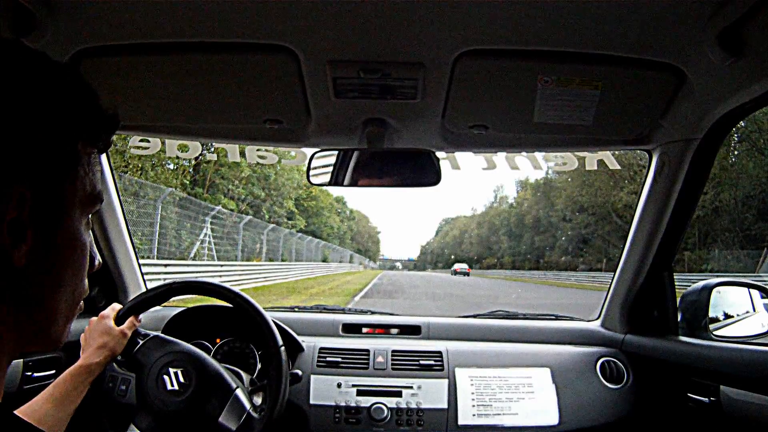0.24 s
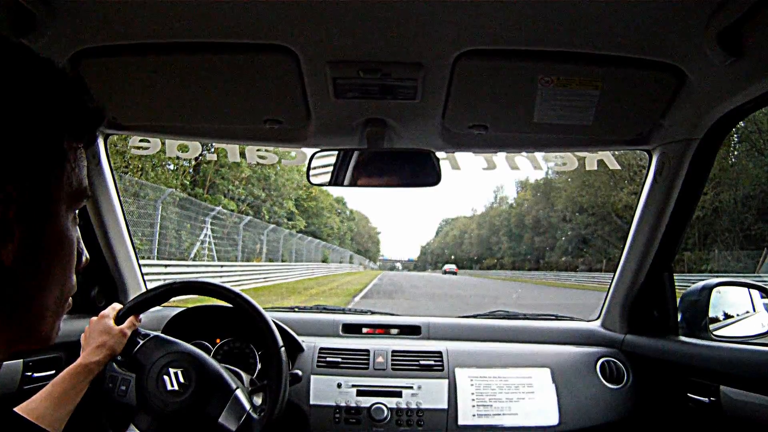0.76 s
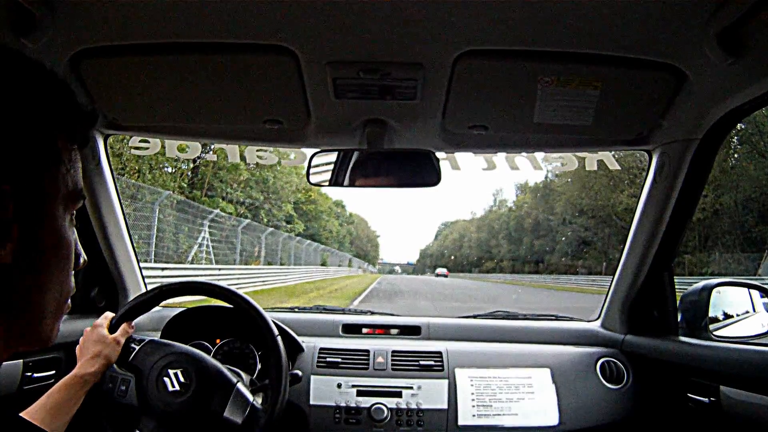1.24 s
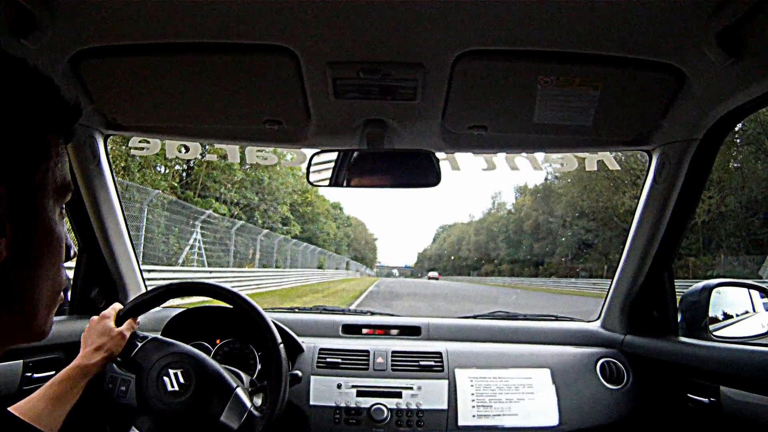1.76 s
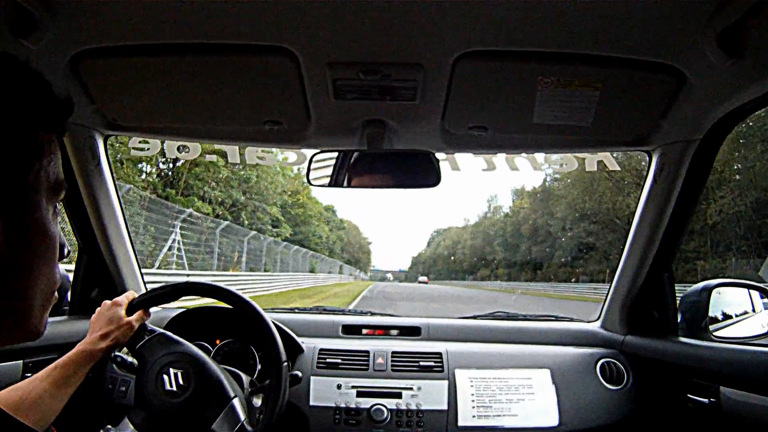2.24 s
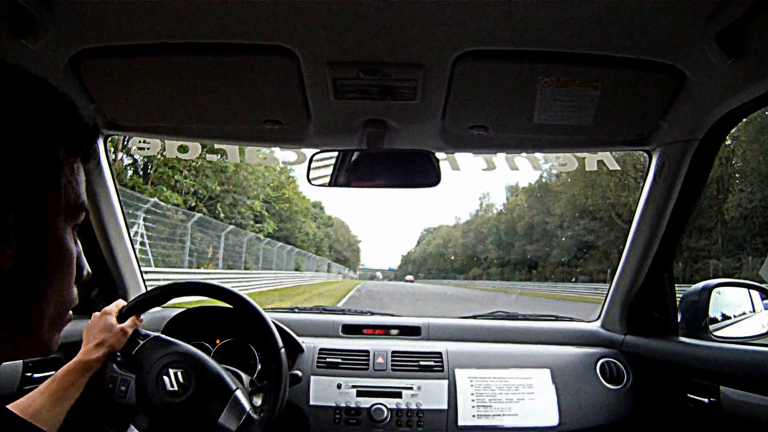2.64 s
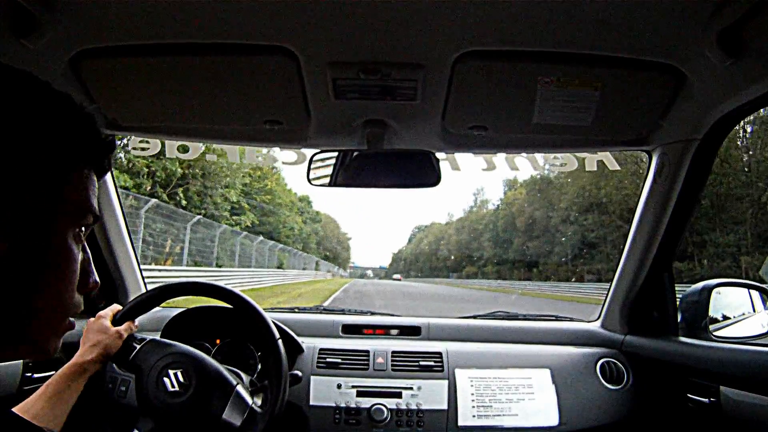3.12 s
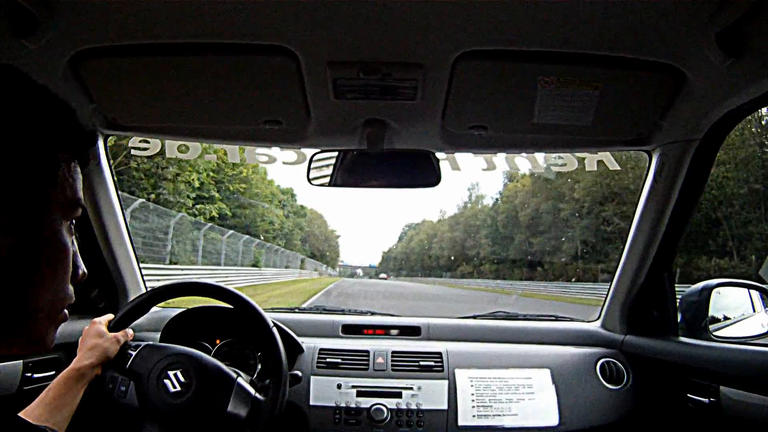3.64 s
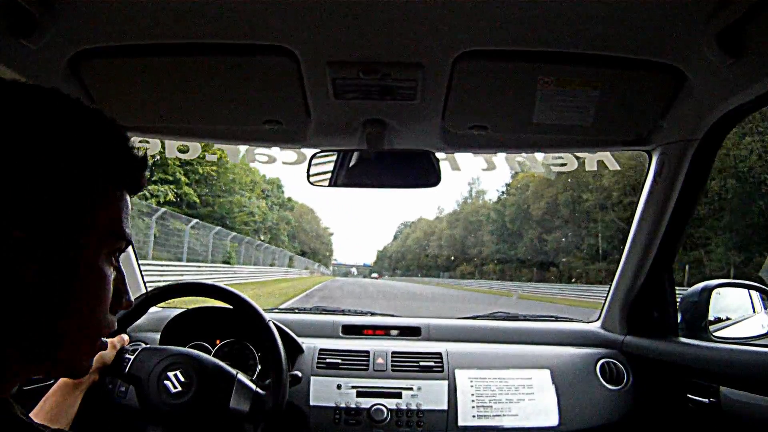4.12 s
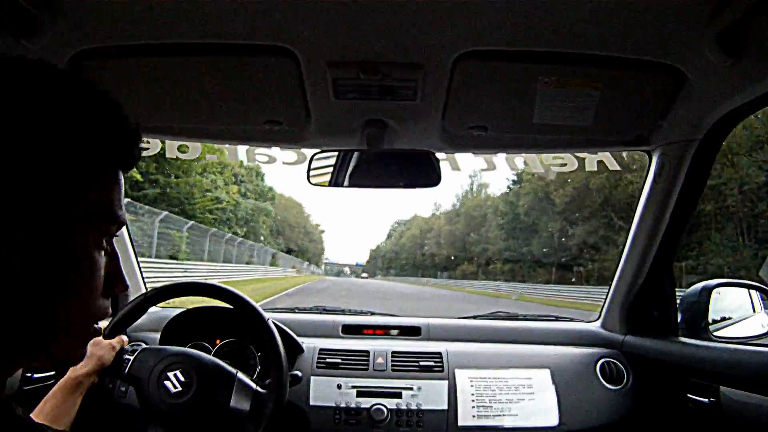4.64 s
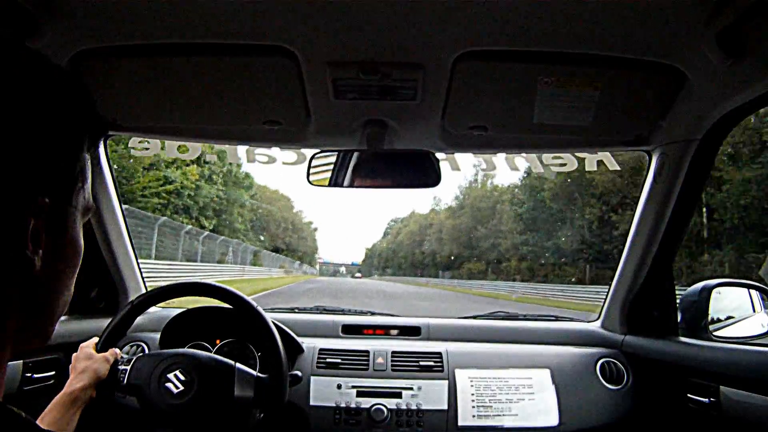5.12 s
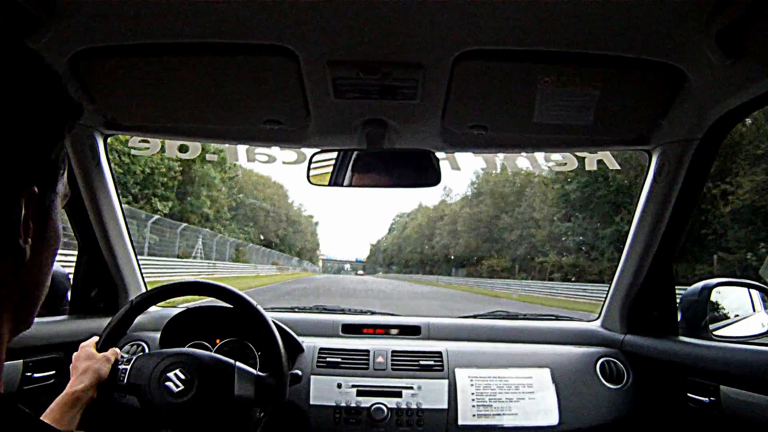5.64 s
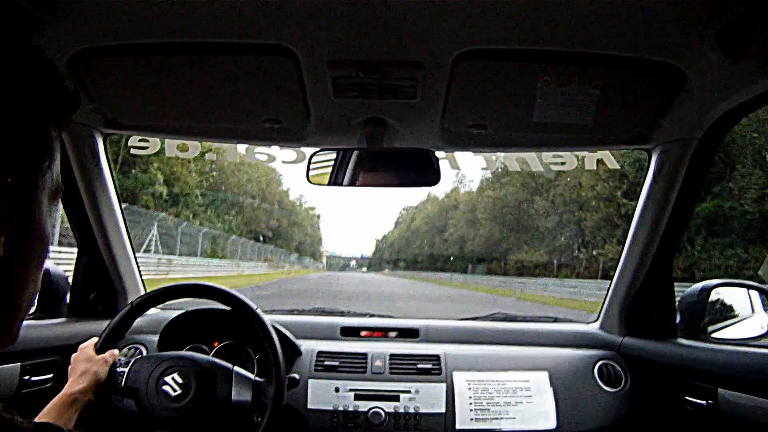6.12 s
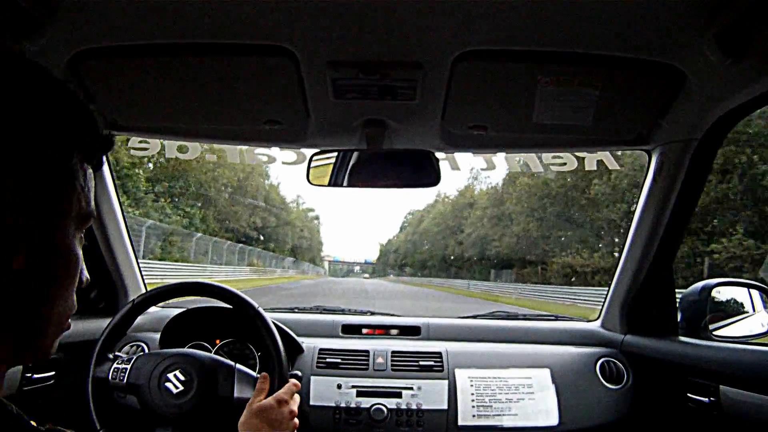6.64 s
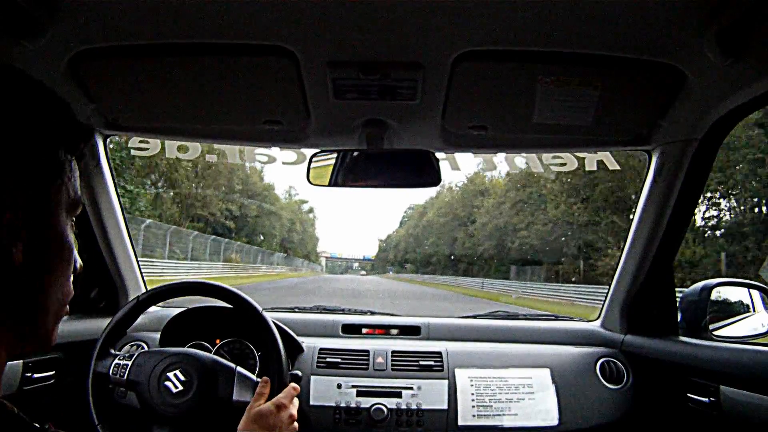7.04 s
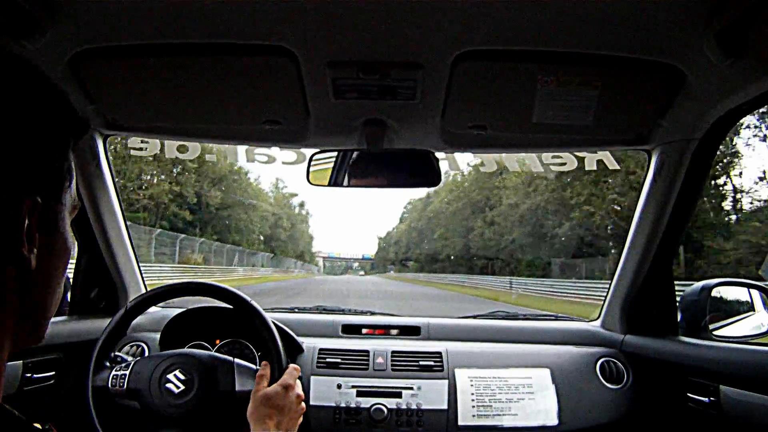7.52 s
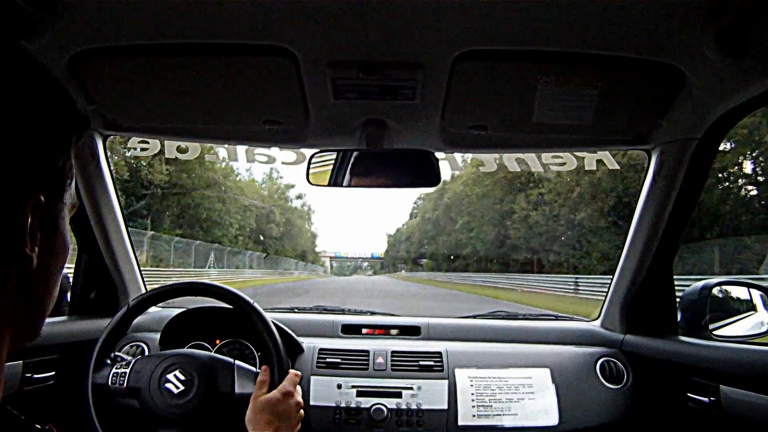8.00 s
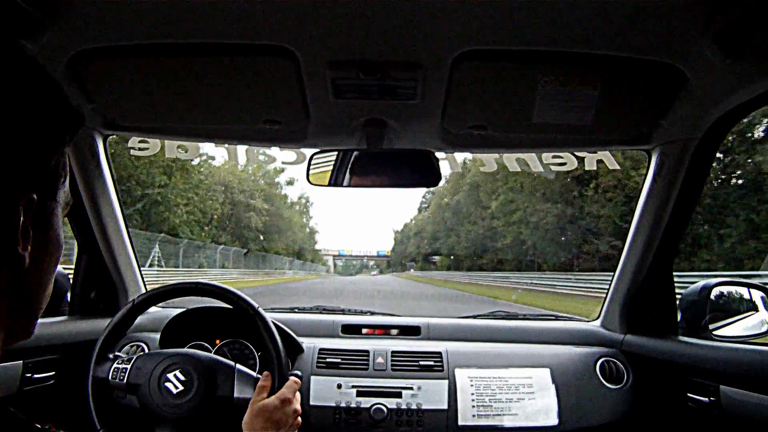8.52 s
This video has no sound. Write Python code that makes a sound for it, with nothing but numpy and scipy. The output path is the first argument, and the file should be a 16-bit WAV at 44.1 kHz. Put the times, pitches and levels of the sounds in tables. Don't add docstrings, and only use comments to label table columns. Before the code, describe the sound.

Inside a small car's boxy cabin, a four-cylinder engine idles low while an indicator relay ticks twice. It pulls away and rises, eases briefly for an upshift, then climbs in a long booming, rattling roar to the limiter. The throttle closes, the gear lever bangs metallically with a deep thump, and the engine pulls on at lower pitch. Road drone and hiss underneath; one gritty, coarse cabin microphone.

```python
import sys
import numpy as np
from scipy import signal
from scipy.fft import rfft, irfft, next_fast_len
from scipy.io import wavfile
from scipy.ndimage import uniform_filter1d

SR = 44100
rng = np.random.default_rng(int(sys.argv[2]) if len(sys.argv) > 2 else 0)


def field_ratio(decibels):
    return 10 ** (np.asarray(decibels, dtype=float) / 20)


def put_to_file(sound):
    columns = np.atleast_2d(sound).T
    safe = np.clip(columns, -1, 1)
    whole_steps = np.round(safe * 32767)
    wavfile.write(sys.argv[1], SR, whole_steps.astype(np.int16))


N = 386757

# t/s, firing rate f/Hz
FIRING_RATE = [(.9, 23.58), (1.12, 31), (1.59, 74.3), (1.95, 100.9), (2.2, 106.3), (2.49, 100.7),
               (2.78, 82.16), (3.1, 102.8), (3.72, 132.6), (4.32, 168.5), (5.13, 217.2), (5.69, 247.7),
               (6.33, 222.7), (6.52, 162.9), (6.63, 153), (6.75, 161.2), (8.23, 195.6), (8.77, 206)]
# t/s, opening [0-1]
THROTTLE = [(2.15, 0.66), (2.3, 0.64), (2.75, 0.8), (2.95, 0.99), (5.9, 0.83), (6.02, 0.18), (6.32, 0.15),
            (6.4, 0.26), (6.65, 0.67), (6.95, 0.73), (8.77, 0.73)]
# t/s, length/s, level/dB
ROAR_SWELLS = [(0.077, 0.058, 6), (0.656, .15, 6.5), (1.226, 0.16, -3.5), (2.086, 0.1, 1.5),
               (2.677, 0.35, 3.5), (3.5, 0.68, 1.5), (4.1, .12, -1.5), (4.336, 0.1, 3.5),
               (4.572, 0.16, -4.5), (4.94, 0.49, 1.5), (5.1, 0.12, -5), (5.3, 0.25, 0.5), (3.202, 0.2, 1),
               (7.8, 0.22, -0.5), (6.624, 0.1, -3), (1.65, 0.36, 0.5), (6.796, 0.18, 0.5), (5.665, 0.32, 3),
               (5.946, .1, 2.5), (6.045, 0.15, 0), (6.248, 0.27, 3.5), (6.52, .14, 5), (7.333, 0.15, 2),
               (7.615, 0.17, -2.5), (8.038, 0.16, 2), (8.588, 0.88, -1.5)]

# f/Hz, level/dB
BOOM = [(22, -36), (25, -20), (36, -13), (70, -11.5), (90, -17.5), (150, -16), (180, -12.5), (245, -13.5)]
# f/Hz, width/Hz, level/dB
BOOM_DIPS = [(57.5, 12, -14.5), (80.4, 6.1, -7), (131, 4.2, -8.5), (190, 3.5, -9), (204, 1.9, -9),
             (219.3, 2.9, -8.5), (238.4, 5.8, -3.5)]
# f/Hz, width/Hz, level/dB
DOUBLE_PANELS = [(74.5, 9.4, -15.5), (103.4, 28, -19), (130, 26, -24.5), (152, 23, -27), (180, 20, -30),
                 (207.4, 12, -26), (289.66, 35, -25.5), (317.85, 17, -31.5), (342, 7.9, -27.5),
                 (391, 44, -25.5), (416, 8.4, -21), (458, 33, -22.5), (484, 34, -24)]
# f/Hz, width/Hz, level/dB
TRIPLE_PANELS = [(114, 34, -22.5), (171, 40, -29.5), (215, 37, -29), (311, 65, -28), (351.4, 7.1, -25),
                 (389, 37, -27.5), (427, 14, -33), (470, 20, -44), (516, 26, -22.5), (610, 81, -25),
                 (667, 20, -21), (723, 27, -28.5)]
# f/Hz, width/Hz, level/dB
ODD_PANELS = [(105, 22, -44), (286, 31, -37), (394, 11, -26.5), (443, 37, -25), (510.5, 43, -23),
              (607, 86, -32.5), (690, 35, -27.5)]
# (f/Hz, width/Hz, level/dB)
CRANK_LINES = [
    (.5, 0.1, [(46, 11, -37), (66.4, 23, -32.5), (97, 12, -42), (123, 23, -33)]),
    (.75, 0.98, [(63, 33, -32), (95, 13, -38.5), (121.5, 12, -31.5), (145.6, 12, -29), (170.7, 10, -22.5), (178.3, 4, -18.5), (189.3, 9, -25)]),
    (5 / 4, .7, [(130, 16, -30), (168.4, 14, -30), (204, 13, -32), (233, 23, -30.5), (249, 14, -41), (274, 10, -30), (298, 14, -31)]),
    (3 / 2, 0.11, [(158, 52, -40.5), (184, 6.7, -37.5), (232, 10, -36), (289, 8.7, -32.5), (349.3, 15.4, -25), (367, 14, -24)]),
    (7 / 4, 0.77, [(171, 28, -32.5), (240, 29, -30.5), (325, 25, -31), (349, 26, -31), (366, 30, -28.5), (392.2, 15, -24), (434, 20, -30)]),
    (9 / 4, 1, [(202, 30, -46.5), (270, 27, -34), (393, 36, -32), (439, 32, -26), (445, 21, -35), (517, 37, -24), (560.3, 11, -17)]),
               (5 / 2, 1, [(267, 45, -37), (345, 94, -29.5), (401, 30, -30), (508, 69, -33.5),
                (590, 92, -35)]), (13 / 4, 0.54, [(330, 65, -42), (468, 92, -32), (512, 30, -33),
                (553, 30, -30.5), (657, 35, -34.5)]), (7 / 2, 0.35, [(357, 88, -32), (567, 57, -37.5),
                (604, 30, -40), (675.4, 15.5, -26.5), (724, 32, -28.5), (775, 55, -43.5), (860, 17, -35)]),
                (15 / 4, 0.9, [(385, 50, -37), (487, 130, -44), (671, 38, -32), (721, 35, -34.5)]),
                (4, 1, [(252, 67, -42), (325, 18, -32), (380, 36, -33.5), (514, 63, -29.5),
                (651, 59.6, -29), (698, 24, -35), (763, 31, -38), (880, 100, -41)]),
                (17 / 4, 0.61, [(442, 40, -34.5), (513, 60, -34.5), (606, 33, -35), (665, 34, -43),
                (765, 39, -42)]), (9 / 2, .1, [(420, 53, -43.5), (535, 90, -35.5), (616, 56, -36),
                (704, 50, -42), (770, 50, -43.5), (864, 40, -45.5), (980, 71, -43), (1072, 44, -38.5)]),
               (19 / 4, 0.44, [(270, 68, -43), (430, 39, -43), (514, 30, -49), (665, 40, -36.5),
              (746, 40, -42.5), (910, 110, -45.5)]), (5, 0.62, [(300, 80, -39), (525, 59, -34.5),
              (690, 68, -32.5), (920, 80, -48.5), (1037, 45, -38), (1170, 60, -47)]),
              (23 / 4, 0.55, [(546, 20, -43.5), (610, 50, -51), (700, 40, -53), (956, 60, -49),
              (1050, 69, -46), (1180, 65, -44.5)]), (11 / 2, 1, [(520, 26, -41), (667, 34, -33),
              (760, 43, -49), (910, 100, -44), (1040, 100, -47)]), (6, 1, [(538, 40, -37), (661, 67, -28.5),
              (733, 37, -31.5), (810, 44, -42), (1060, 40, -46), (1147, 41, -36)])]
# multiple of firing rate, low-rev level/dB, full-rev level/dB
CABIN_LINES = [(5.251, -3.5, -11), (6.25, -18, -7.5), (6.5, -12, -9.5), (6.75, -16, -10), (6.999, -9, -10),
               (7.25, -15.5, -12), (7.5, -12, -10), (8, -14.5, -5), (9, -18, 0)]
# f/Hz, width/Hz, level/dB
CABIN = [(190, 128, -3.5), (328.5, 56, 5.5), (343, 43, 2.5), (431, 21, -4), (523, 80, 2), (665, 21.5, 4.5),
         (747, 23, -3.5), (787, 22, -15), (1060, 45, -4.5), (1167, 30, -9.5)]

# t/s, peak level/dB, brightness/dB per octave
LEVER_HITS = [
    (6.3131, -6, 0),
    (6.3157, -15, 2),
    (6.3192, -17, 2),
    (6.3235, -28, 12),
    (6.3351, -15, 11),
    (6.3372, -17, 0),
    (6.3405, -22, -3),
    (6.3457, -16, -1),
]
# f/Hz, level/dB, time to fade 60 dB/s
LEVER_MODES = [(770, -8, .035), (1050, -9, .025), (1500, -12, .012), (2050, -3, .016), (2400, -1, .014),
               (2830, 0, .018), (3250, -7, .012), (3750, -15, .012), (4700, -13, .018), (5450, -17, .014)]
# t/s, peak level/dB, f/Hz, time to fade 60 dB/s
KNOCKS = [(0.06, -22, 153, 0.12), (0.09, -24.5, 170, 0.062), (0.532, -27.5, 151, 0.15),
          (0.569, -30, 139, 0.098), (0.628, -21, 48, 0.053), (0.679, -21, 52, 0.14),
          (0.63, -20.5, 131, 0.08), (7.2, -18, 217, 0.12), (6.308, -22, 214, .08), (5.935, -26, 150, .08),
          (6.8, -29, 95, .09), (6.1825, -34, 4590, 0.027), (2.925, -34.5, 2500, 0.044),
          (2.926, -43, 1680, .07), (3.2, -39, 3060, .04), (2.9265, -45, 2050, .04), (2.6, -38, 2950, 0.034),
          (2.924, -46, 4750, .03), (3.6, -43, 2500, .04), (6.327, -5, 44.7, 0.046), (.96, -41, 335, 0.23),
          (6.356, -5, 22, 0.61), (6.559, -11.5, 156, 0.095)]
# t/s, peak level/dB, brightness/dB per octave, time to fade 60 dB/s
CLICKS = [(1.143, -35, -3, 0.03), (1.171, -29.5, 0, 0.022), (1.199, -31.5, 5, 0.02), (2.925, -28.5, 8, 0.1),
          (2.9338, -35.5, 3, 0.029), (3.384, -30, 8.5, 0.03), (6.1833, -19, 6, .024),
          (6.3145, -18, 6, 0.012), (6.3363, -20, 9, 0.015), (6.4428, -24, 1, 0.039),
          (6.6248, -30.5, 16, 0.03)]
# t/s, peak level/dB
RELAY_TICKS = [
    (0.6493, -22),
    (0.9533, -22),
]
# f/Hz, level/dB, time to fade 60 dB/s
RELAY_MODES = [(2030, -19, .12), (2190, -8, .14), (2400, -15, .13), (2560, -11, .12), (2690, -12, .17),
               (2790, -1, .18), (2865, 0, .12), (2975, -16, .17), (3080, -2, .17), (3150, -3, .18),
               (3225, 0, .11), (3545, -17, .11), (3935, -22, .12), (4620, -24, .1)]
# start t/s, end t/s, f/Hz, level/dB
BUZZES = [(-.4, 1.8, 2820, -58.5), (-.4, 1.1, 5260, -72), (2.335, 2.7, 665, -35),
          (2.63, 2.81, 499.5, -24.5), (2.77, 2.92, 520.5, -26.5), (5.56, 5.84, 2203, -33),
          (5.6, 5.76, 2980, -38.5), (5.66, 5.78, 2010, -37), (5.77, 5.95, 2660, -32.5),
          (6.048, 6.16, 1590, -41.5), (6.15, 6.21, 680, -28.5), (6.2, 6.32, 663, -23.5),
          (6.48, 6.57, 665, -27)]

# t/s, level/dB
SHAKE_LEVEL = [(.9, -37), (1.3, -34.5), (1.7, -33.5), (2.15, -26.5), (2.4, -28.5), (2.75, -27.5), (3, -31),
               (4, -25.5), (4.6, -28), (5.1, -27.5), (5.6, -26), (5.9, -18), (6.2, -18.5), (6.6, -22.5),
               (7.2, -23), (7.7, -27), (8.05, -21), (8.3, -27), (8.65, -22.5)]
# t/s, f/Hz
ROCKING = [(1.3, 22), (2.2, 24), (2.7, 29), (3.5, 29), (4.2, 30), (4.6, 24.9), (5.5, 25), (5.9, 22.4),
           (7, 21), (7.3, 29.3), (7.9, 20), (8.3, 27), (8.77, 36.3)]
# f/Hz, level/dB per Hz
SHAKE_COLOUR = [(12, 5.5), (30, 14.5), (42, 13), (52, 10), (100, -31.5)]
# f/Hz, level/dB per Hz
DRONE_COLOUR = [(29, -43), (50, -10.5), (100, -9.5), (200, -4), (310, -16.5), (470, -11), (700, -14),
                (860, -26), (1200, -20.5), (1500, -24), (2000, -68), (3300, -120)]
# f/Hz, level/dB per Hz
HISS_COLOUR = [(470, -2.5), (800, -1.5), (900, -3), (1060, -6.5), (1180, -2), (1270, -7.5), (1490, -6.5),
               (1800, -11), (2040, -7.5), (2500, -9), (2960, -5.5), (3650, -19), (4900, -19.5),
               (6000, -39.5), (7800, -81), (13200, -120)]
# f/Hz, width/Hz, level/dB
HISS_RIDGES = [(1040, 22, 4), (2020, 35, 1.5), (2230, 42, 6), (2660, 18, -11), (2926, 65, -0.5),
               (3090, 54, 3), (5300, 43, -7)]

# t/s, depth/dB, recovery/s
GAIN_DUCKS = [
    (1.209, -4, 0.04),
    (6.355, -11.5, 0.27),
]

TIME = np.arange(N) / SR
SHORT_TIME = np.arange(SR // 4) / SR


def unit(x):
    return x / np.sqrt(np.mean(x ** 2) + 1e-20)


def along(points, hz):
    f, value = np.transpose(points)
    return np.interp(np.log(hz + 1), np.log(f + 1), value)


def over_time(rows):
    s, value = np.transpose(rows)
    return np.interp(TIME, s, value)


def wobble(rate):
    knots = rng.standard_normal(int(N * rate / SR) + 4)
    return np.interp(np.arange(N) * rate / SR, np.arange(len(knots)), knots)


def filtered(x, response):
    m = next_fast_len(len(x) + SR // 4)
    return irfft(rfft(x, m) * response(np.fft.rfftfreq(m, 1 / SR)), m)[:len(x)]


def peaks(table, hz):
    return np.sqrt(sum(field_ratio(2 * db) / (1 + ((hz - c) / (w / 2)) ** 2) ** 2 for c, w, db in table))


def swept(table, hz):
    grid = np.arange(2500.)
    return np.interp(hz, grid, peaks(table, grid))


def cabin_gain(hz):
    return np.sqrt(sum(field_ratio(2 * db) / (1 + ((hz - c) / (w / 2)) ** 2) for c, w, db in CABIN))


def rush(colour, patchy_db, ring=0):
    _, _, z = signal.stft(rng.standard_normal(N), SR, nperseg=1024)
    patches = uniform_filter1d(rng.standard_normal(z.shape), size=8, axis=0)
    patches = uniform_filter1d(patches, size=6, axis=1)
    white = signal.istft(z * field_ratio(patchy_db * unit(patches)), SR, nperseg=1024)[1][:N]
    return unit(filtered(white, lambda f: field_ratio(along(colour, f)) * cabin_gain(np.maximum(f, 150)) ** ring))


def add(track, s, sound):
    part = track[round(s * SR):][:len(sound)]
    part += sound[:len(part)]


def driving():
    flywheel_s = 0.052
    rate = uniform_filter1d(over_time(FIRING_RATE), round(flywheel_s * SR))
    shut = 1 - over_time(THROTTLE)
    surge_db = sum(db * np.exp(-(2 * (TIME - s) / length) ** 2) for s, length, db in ROAR_SWELLS)
    return rate, shut, surge_db


def firing_boom(rate, shut, turns):
    limiter_s, limiter_length_s, limiter_db = 5.7, 0.16, -12.5
    level_db = along(BOOM, rate) - 6 * shut
    level_db += sum(db / (1 + ((rate - c) / (w / 2)) ** 2) for c, w, db in BOOM_DIPS)
    level_db += limiter_db * np.exp(-(2 * (TIME - limiter_s) / limiter_length_s) ** 2)
    boom = field_ratio(level_db + 1.03 * wobble(19)) * np.cos(turns + 0.42 * wobble(24))
    return np.sqrt(2) * boom


def panel_tones(rate, shut, turns):
    effort_db = -17 * shut
    loose = np.clip(rate / 150, .1, 1)
    double = swept(DOUBLE_PANELS, 2 * rate) * field_ratio(effort_db + 3.8 * wobble(19))
    tone = double * np.cos(2 * turns + 0.64 * loose * wobble(11.0))
    triple = swept(TRIPLE_PANELS, 3 * rate) * field_ratio(effort_db + 1.15 * wobble(13))
    tone += triple * np.cos(3 * turns + 0.99 * loose * wobble(8.4))
    odd = swept(ODD_PANELS, 11 / 4 * rate) * field_ratio(.8 * effort_db + 1.5 * wobble(12))
    tone += odd * np.cos(11 / 4 * turns + .45 * wobble(14))
    for multiple, share, panels in CRANK_LINES:
        flicker = field_ratio(share * effort_db + 1.3 * wobble(9))
        phase = 2 * np.pi * rng.random() + (.22 + .03 * multiple) * wobble(13)
        tone += swept(panels, multiple * rate) * flicker * np.cos(multiple * turns + phase)
    for k in range(4, 9):
        tone += swept([(36, 9.6, -34 - 4 * (k - 4))], rate) * np.cos(k * turns)
    return np.sqrt(2) * tone


def cabin_tones(rate, turns, load_db):
    grid = np.linspace(0, 3000, num=1500)
    gain = cabin_gain(grid) ** 0.91
    revs = np.clip((rate - 90) / 140, 0, 1)
    tones = np.zeros(N)
    for multiple, low_db, full_db in CABIN_LINES:
        drift = 2 * np.pi * rng.random() + .08 * multiple * wobble(22)
        level = field_ratio(low_db + revs * (full_db - low_db) + 2.5 * wobble(8))
        tones += level * np.interp(multiple * rate, grid, gain) * np.sin(multiple * turns + drift)
    tones *= np.clip((rate - 25) / 60, .05, 1)
    return field_ratio(load_db - 9.0) * tones


def engine(rate, shut, surge_db, load_db, turns):
    grit = field_ratio(.6 * wobble(70) * np.clip(rate / 120, 0, 1))
    overtones = field_ratio(.5 * surge_db) * panel_tones(rate, shut, turns)
    return firing_boom(rate, shut, turns) + grit * (overtones + cabin_tones(rate, turns, load_db))


def gear_lever():
    out, t = np.zeros(N), SHORT_TIME
    for s, db, bright_db in LEVER_HITS:
        ring = np.zeros(len(t))
        for hz, level, t60 in LEVER_MODES:
            mode_db = level + bright_db * np.log2(hz / 2800) + rng.normal(0, .8)
            ring += field_ratio(mode_db - 60 * t / t60) * np.sin(2 * np.pi * hz * t)
        add(out, s, field_ratio(db - 5) * ring * (1 - np.exp(-t / .0003)))
    return out


def knocks():
    out, t = np.zeros(N), SHORT_TIME
    for s, db, hz, t60 in KNOCKS:
        onset = 1 - np.exp(-t / min(.0029, 3.1 / hz))
        add(out, s, field_ratio(db + 7.5 - 60 * t / t60) * np.sin(2 * np.pi * hz * t) * onset)
    return out


def plastic_clicks():
    out, t = np.zeros(N), SHORT_TIME
    hz = np.fft.rfftfreq(len(t), 1 / SR)
    for s, db, bright_db, t60 in CLICKS:
        colour = field_ratio(along(HISS_COLOUR, hz) + bright_db * np.log2(hz / 3000 + .01))
        snap = unit(irfft(rfft(rng.standard_normal(len(t))) * colour, len(t)))
        add(out, s - .001, field_ratio(db - 2.5 - 60 * t / t60) * snap * (1 - np.exp(-t / 0.00065)))
    return out


def relay():
    out, t = np.zeros(N), SHORT_TIME
    for s, db in RELAY_TICKS:
        ring = np.zeros(len(t))
        for hz, level, t60 in RELAY_MODES:
            jitter = np.cumsum(rng.normal(0, 0.047, len(t)))
            mode = field_ratio(level + rng.normal(0, 0.48) - 60 * t / t60)
            ring += mode * np.sin(2 * np.pi * hz * t + jitter)
        add(out, s - .003, field_ratio(db - 6.0) * ring * (1 - np.exp(-t / .003)))
    return out


def buzzing_tones():
    out = np.zeros(N)
    for start, end, hz, db in BUZZES:
        swell = np.sin(np.pi * np.clip((TIME - start) / (end - start), 0, 1)) ** 0.69
        out += field_ratio(db + 1.2 * wobble(27)) * swell * np.sin(2 * np.pi * hz * TIME + 0.7 * wobble(70))
    return out


def body_shake():
    rocking_hz = over_time(ROCKING) + 2 * wobble(8.5)
    rocking = np.sqrt(2) * np.sin(2 * np.pi * np.cumsum(rocking_hz) / SR)
    rumble = field_ratio(-5) * rush(SHAKE_COLOUR, patchy_db=0.0)
    return field_ratio(over_time(SHAKE_LEVEL) + 2.4 * wobble(5.6)) * (field_ratio(0.69 * wobble(11.0)) * rocking + rumble)


def idle_dulling(rate):
    return field_ratio(-4 * np.clip((90 - rate) / 50, 0, 1))


def road_drone(rate, load_db):
    moving_db, idle_db = -5.5, 0
    drone_db = moving_db + (idle_db - moving_db) * np.clip((70 - rate) / 25, 0, 1)
    drone = field_ratio(load_db + drone_db + wobble(12)) * rush(DRONE_COLOUR, patchy_db=1.5, ring=1.0)
    drone += (idle_dulling(rate) - 1) * filtered(drone, lambda f: 1 / (1 + (580 / (f + 1)) ** 8))
    idle_body = field_ratio(-3 * np.clip((70 - rate) / 30, 0, 1))
    drone += (idle_body - 1) * filtered(drone, lambda f: 1 / (1 + (250 / (f + 1)) ** 8))
    return drone


def valve_hiss(rate, turns, shut, surge_db):
    moving_db = -44 + 9 * np.log2(rate / 100) - 9.5 * shut ** 2 + 1.13 * surge_db
    idle_db = -51.5 + 0.29 * np.minimum(surge_db, 0)
    hiss_db = np.maximum(moving_db, idle_db)
    puffs = unit(1 + 0.044 * np.sin(turns) + 0.039 * np.sin(turns / 2))
    level = field_ratio(hiss_db + 2.0 + 0.79 * wobble(7.9) + 0.66 * wobble(30))
    hiss = level * puffs * rush(HISS_COLOUR, patchy_db=0.76)
    ringing = filtered(hiss, lambda f: np.sqrt(1 + peaks(HISS_RIDGES, f) ** 2) - 1)
    hiss += field_ratio(0.34 * surge_db + 1.9 * wobble(7.8)) * ringing
    hiss += (idle_dulling(rate) - 1) * filtered(hiss, lambda f: 1 / (1 + (f / 1400) ** 6))
    return hiss


def scene():
    rate, shut, surge_db = driving()
    turns = 2 * np.pi * np.cumsum(rate) / SR
    load_db = -25 + 5.5 * np.log2(rate / 100) - 7.5 * shut + surge_db
    mono = engine(rate, shut, surge_db, load_db, turns)
    mono += gear_lever() + knocks() + plastic_clicks() + relay() + buzzing_tones()
    mono += body_shake() + road_drone(rate, load_db) + valve_hiss(rate, turns, shut, surge_db)
    return np.array([mono, mono])


def low_pass(x):
    return signal.sosfilt(signal.butter(12, 16500, fs=SR, output="sos"), x)


def record(dry):
    duck_db = sum(db * (TIME > s) * np.exp(-np.abs(TIME - s) / back) for s, db, back in GAIN_DUCKS)
    ducked = dry[0] * uniform_filter1d(field_ratio(duck_db), size=150)
    ducked = ducked / (1 + np.abs(ducked / .8) ** 6) ** (1 / 6)
    padded = np.pad(ducked, (0, SR // 10), "reflect")
    smooth = filtered(padded, lambda hz: 1 / np.sqrt(1 + (hz / 5500) ** 20))
    slow = signal.resample_poly(smooth, 40, 147)
    held = signal.resample_poly(np.repeat(slow, 4), 147, 160)
    held = filtered(held, lambda hz: hz < 15420)[:N]
    held *= np.clip((TIME[-1] - TIME) / .003, 0, 1)
    hz, _, z = signal.stft(held, SR, nperseg=2048)
    field = unit(uniform_filter1d(rng.standard_normal(z.shape), size=14, axis=0))
    field = field + 1.3 * rng.standard_normal(z.shape[1])
    speck_db = -22.0 + 3.7 * np.log2(np.clip(hz, 200, 5000) / 200) - 12 * (hz > 6000)
    specks = field_ratio(speck_db)[:, None] * (field > 3.3)
    stray = signal.istft(1j * z * specks, nperseg=2048)[1][:N]
    return low_pass(np.array([held + stray, held - stray]))


dry = scene()
out = record(dry)
put_to_file(out)
```